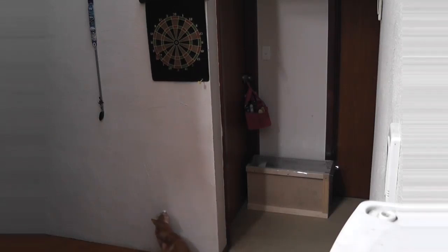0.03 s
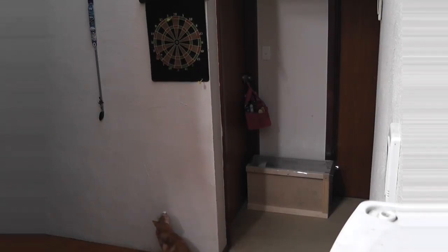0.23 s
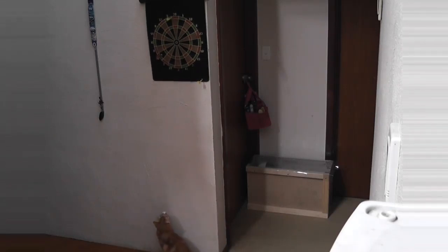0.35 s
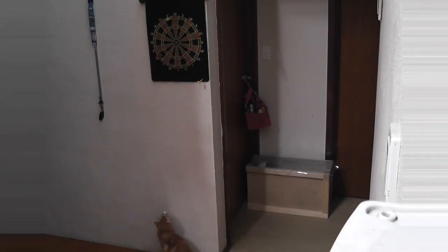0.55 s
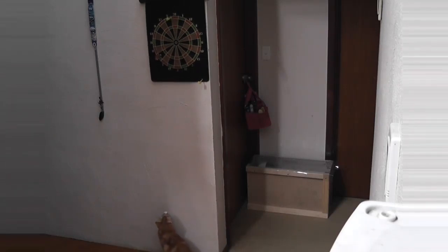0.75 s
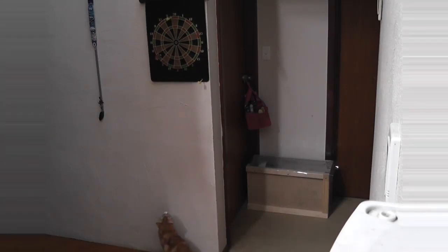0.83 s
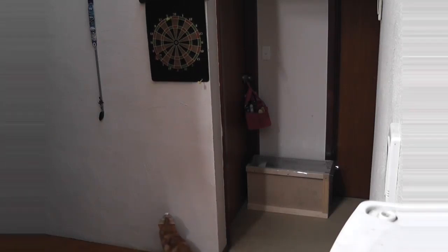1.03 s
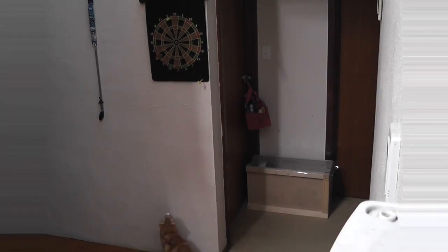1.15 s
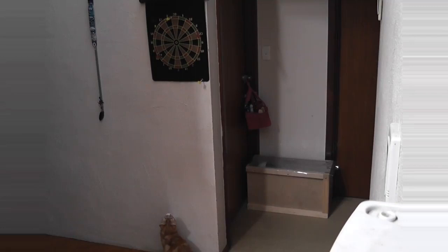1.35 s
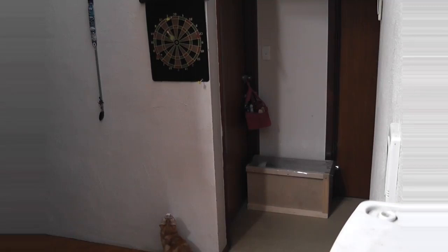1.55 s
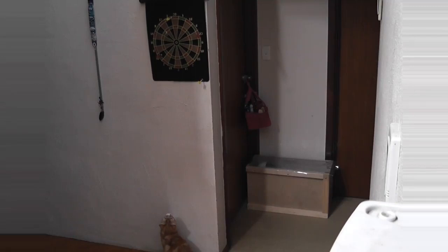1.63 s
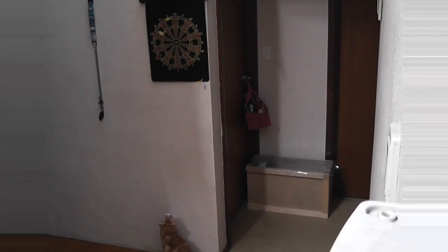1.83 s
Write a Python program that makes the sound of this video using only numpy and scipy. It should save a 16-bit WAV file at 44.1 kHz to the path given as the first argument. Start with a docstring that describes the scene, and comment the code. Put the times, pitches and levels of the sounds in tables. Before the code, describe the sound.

Two magnetic darts strike a hanging dartboard with sharp, hollow clacks over a second apart, each ringing on in a small bare room; soft sleeve rustling near the microphone, faint hum and hiss.

```python
"""A soft swishing, likely a sleeve, comes and goes close to the microphone over a quiet room hum and hiss.
Then two magnetic darts clack onto a dartboard hanging on the wall of a small, bare room.
Each magnet ticks (pulse and noise), knocks a hollow note out of the board (damped modes) and snaps
flat a few ms later (noise burst); walls echo it (delays) and the room rings on (modes, decaying noise)."""
import sys
import numpy as np
from scipy import signal
from scipy.fft import rfft, irfft
from scipy.io import wavfile
from scipy.ndimage import uniform_filter1d

SR = 44100
rng = np.random.default_rng(int(sys.argv[2]) if len(sys.argv) > 2 else 0)


def wav_out(sig):
    """Save sig, one row per channel (or a flat mono array), as 16-bit PCM at SR to the path in sys.argv[1]."""
    wavfile.write(sys.argv[1], SR, np.round(np.clip(np.atleast_2d(sig).T, -1, 1) * 32767).astype(np.int16))


N = 83790  # samples
TIME_S = np.arange(N) / SR
BIN_HZ = np.fft.rfftfreq(N, 1 / SR)


def undb(db):
    """Decibel law: amplitude ratio of a level in dB."""
    return 10 ** (np.asarray(db) / 20)


def at_hz(points, hz):
    """Logarithmic frequency scale: read a (f/Hz, value) table between its points."""
    table_hz, values = np.array(points, float).T
    return np.interp(np.log(np.maximum(hz, 1)), np.log(table_hz), values)


def noise(points):
    """Spectral shaping: Gaussian noise weighted in frequency, scaled to rms 1."""
    spectrum = rfft(rng.standard_normal(N))
    shaped = irfft(spectrum * undb(at_hz(points, BIN_HZ)), N)
    return shaped / shaped.std()


def wide_noise(points, side):
    """Mid-side stereo: an independent noise, added left and subtracted right, sets the width."""
    difference = irfft(rfft(noise(points)) * undb(at_hz(side, BIN_HZ)), N)
    return noise(points) + difference * np.array([[1], [-1]])


def click(points):
    """Minimum phase: folding the cepstrum gives one causal pulse with the given spectrum."""
    log_spectrum = np.log(undb(at_hz(points, BIN_HZ)))
    cepstrum = irfft(log_spectrum, N)
    index = np.arange(N)
    fold = np.where(index < N // 2, 1 + np.sign(index), 0)  # keep zero, double the causal half
    return irfft(np.exp(rfft(cepstrum * fold)), N)


def brighten(x, db_per_octave):
    """Spectral tilt: a short minimum-phase filter slopes the three octaves above 2 kHz."""
    tilt = click([(2000, 0), (16000, 3 * db_per_octave)])
    return signal.fftconvolve(x, tilt[None, :256], axes=-1)[:, :N]


def pan(db):
    """Interchannel level difference: left and right gains for L-R in dB."""
    return undb(np.array([[db], [-db]]) / 2)


def fade(t60):
    """Exponential decay: the amplitude falls 60 dB in t60 seconds."""
    return np.exp(-np.log(1000) * TIME_S / t60)


def rise(seconds):
    """Exponential build-up towards 1 with the given time constant."""
    return 1 - np.exp(-TIME_S / seconds)


def late(x, seconds):
    """Propagation delay: shift a sound later by whole samples."""
    k = max(int(seconds * SR), 0)
    silence = np.zeros(x.shape[:-1] + (k,))
    return np.concatenate([silence, x], axis=-1)[..., :N]


def mode(hz, db, t60):
    """Damped oscillator: one struck resonance, first pushed away from the listener."""
    return -undb(db) * np.sin(2 * np.pi * hz * TIME_S) * fade(t60)


# hum spectrum (f/Hz, relative level per Hz/dB) and its left-right difference (f/Hz, side level/dB)
HUM_SPECTRUM = [(15, -48), (25, -20.5), (151, -1), (177, -8), (270, -4), (426, -8), (492, -5.5), (570, -17),
                (638, -7.5), (692, -13.5), (1200, -15), (1560, -37), (2640, -120)]
HUM_WIDTH = [(40, -11), (110, -6), (250, -4.5), (800, -3.5)]
HUM_DB, HUM_PAN_DB = -54, 0.5


def room_hum():
    """Stationary random noise: the low hum of the room."""
    return undb(HUM_DB) * pan(HUM_PAN_DB) * wide_noise(HUM_SPECTRUM, HUM_WIDTH)


# microphone hiss spectrum (f/Hz, relative level per Hz/dB) and left-right difference (f/Hz, side level/dB)
HISS_SPECTRUM = [(600, -10), (1200, 3), (3000, 2), (7000, 3), (11000, -9), (16000, -10)]
HISS_WIDTH = [(1200, 1.5), (2400, -4.5), (4400, -38), (8000, -35), (15000, -27)]
HISS_DB = -58.5


def microphone_hiss():
    """Self-noise: the microphone adds a steady broadband hiss."""
    return undb(HISS_DB) * wide_noise(HISS_SPECTRUM, HISS_WIDTH)


# course of the swishing (t/s, level/dB)
SWISH_COURSE = [(0, -42), (.094, -50), (.17, -49.5), (.26, -50.5), (0.318, -46), (0.356, -42), (.43, -48),
                (.52, -53.5), (.61, -57), (.72, -51.5), (.81, -45.5), (.9, -47), (.99, -44), (1.1, -46.5),
                (1.19, -48.5), (1.27, -54), (1.35, -45.5), (1.41, -45.5), (1.47, -50.5), (1.62, -56),
                (1.75, -49.5), (1.83, -48.5), (1.9, -52)]
# cloth noise spectrum (f/Hz, relative level per Hz/dB) and left-right difference (f/Hz, side level/dB)
SWISH_SPECTRUM = [(530, -5), (900, -14), (1120, -7.5), (1370, -6.5), (2020, -0.5), (2510, -4.5), (2930, -1),
                  (4180, -2.5), (5840, -1.5), (12100, -5), (15500, -11)]
SWISH_WIDTH = [(1200, -3), (2400, -27), (4400, -56), (6500, -77), (8100, -8.5), (10500, -12), (15000, -43)]
GRAIN_DB, GRAIN_SAMPLES = 1.0, 120  # rms of the level flutter, averaging length


def swish():
    """Friction noise: cloth slides near the microphone, a fine-grained hiss swelling with each movement."""
    course_s, course_db = np.array(SWISH_COURSE).T
    grain = uniform_filter1d(rng.standard_normal(N), size=GRAIN_SAMPLES)
    level_db = np.interp(TIME_S, course_s, course_db) + GRAIN_DB * grain / grain.std()
    return undb(level_db) * wide_noise(SWISH_SPECTRUM, SWISH_WIDTH)


# diffuse tail spectrum (f/Hz, relative level per Hz/dB) and left-right difference (f/Hz, side level/dB)
TAIL_SPECTRUM = [(50, -25), (150, -26), (320, -5), (500, -7), (790, -7), (1000, -17), (1500, -15.5),
                 (2300, -22.5), (3400, -22.5), (5000, -26.5), (8000, -29), (16000, -43.5)]
TAIL_WIDTH = [(100, -19), (400, -10), (800, -5), (1500, -8), (2500, -14), (4500, -84), (8000, -13),
              (15000, -27)]
# build-up of the tail (f/Hz, time constant/s) and its decay (f/Hz, t60/s)
TAIL_BUILD_UP = [(125, 0.052), (500, 0.086), (1000, 0.004), (2000, 0.0015), (8000, 0.00067)]
TAIL_DECAY = [(100, 0.54), (500, 0.69), (1500, 0.64), (3500, 0.48), (7000, 0.39), (14000, 0.2)]
TAIL_DB = -21.5


def tail():
    """Diffuse reverberation in octave bands: the lows come late, the treble dies first."""
    spectrum = rfft(wide_noise(TAIL_SPECTRUM, TAIL_WIDTH))
    octave = np.log2(np.clip(BIN_HZ, 128, 16384))
    out = 0
    for k in range(7, 15):  # band centres 2 ** k, 128 to 16384 Hz
        weight = np.maximum(1 - abs(octave - k), 0)  # overlapping triangles
        band = irfft(spectrum * weight, N)
        build_up = rise(at_hz(TAIL_BUILD_UP, 2 ** k))
        out = out + band * build_up * fade(at_hz(TAIL_DECAY, 2 ** k))
    return undb(TAIL_DB) * out


# long ringing notes of board and room (f/Hz, level/dB, t60/s, L-R/dB)
RINGING_NOTES = [(395, -42, 0.95, -4), (419, -35, 0.47, 6), (428.5, -29.5, 0.64, 1), (483, -28.5, 0.8, -4),
                 (512, -23, 0.68, 3), (517, -38.5, 0.95, 0), (536, -20, 0.57, -9.5),
                 (532.4, -27.5, 0.47, 3), (578, -30.5, 0.86, 4), (598, -37.5, 1, -3), (650, -41, 0.37, -10),
                 (700, -45, 1, -7), (776, -38, 0.69, 1), (930, -46.5, 0.8, -6)]
RING_RISE_S = 0.071


def ringing():
    """Beating of close resonances: a few notes around the knock build up and beat as they die."""
    notes = sum(pan(pan_db) * mode(hz, db, t60) for hz, db, t60, pan_db in RINGING_NOTES)
    return rise(RING_RISE_S) * notes


# wall echoes (delay t/s, level/dB, L-R/dB)
WALL_ECHOES = [(.0081, -12.5, -18.5), (.0140, -10.5, 16.5), (.0162, -22.5, -25), (.0222, -10, -3),
               (0.039, -32, 19), (.0469, -11.5, 5), (0.052, -17, -2), (.0587, -20.5, 2),
               (0.0731, -19.5, -2), (0.0763, -23, -8), (.0882, -30, 7), (.1036, -17.5, 0),
               (.1131, -15.5, -2), (.1151, -23, 0), (0.1283, -25, 4), (.1368, -19.5, -1), (.1463, -24, -5)]
ECHO_HZ, ECHO_Q, ECHO_DB = 510, 1.78, 0.5  # band-pass centre, sharpness and gain


def echoes(direct):
    """Early reflection: nearby walls throw back mainly the hollow knock."""
    first_s = WALL_ECHOES[0][0]
    ratio = BIN_HZ / ECHO_HZ
    band_pass = ratio / np.hypot(ratio, ECHO_Q * (ratio ** 2 - 1))
    # delaying before the zero-phase filter leaves room for its pre-ringing
    hollow = undb(ECHO_DB) * irfft(rfft(late(direct, first_s)) * band_pass, N)
    return sum(undb(db) * pan(pan_db) * late(hollow, s - first_s) for s, db, pan_db in WALL_ECHOES)


def thump(db):
    """Low damped mode: the board thumps against the wall."""
    return mode(95, -41 + db, 0.0053)


# board modes, the hollow knock first (f/Hz, t60/s, level at first dart's spot/dB, at second's/dB)
BOARD_MODES = [(522.5, 0.022, 5, 4), (303, 0.012, -14, -11), (853, 0.015, -13, -23.5),
               (925, 0.022, -20, -8), (1386, 0.01, -13.5, -9), (1725, 0.02, -16, -29),
               (2640, .02, -24.5, -34), (3156, 0.012, -17, -18.5), (3850, .018, -17, -40),
               (5740, 0.024, -45, -26)]
KNOCK_RISE_S = 0.0015
MUTE_DB, MUTE_S = -5.5, 0.003  # damping of the knock and its time constant


def board(spot, snap_s):
    """Modal excitation: the landing spot weights the modes; the magnet, once flat, damps the knock."""
    knock, *others = [mode(hz, db[spot], t60) for hz, t60, *db in BOARD_MODES]
    mute = undb(MUTE_DB * late(rise(MUTE_S), snap_s))
    return knock * rise(KNOCK_RISE_S) * mute - sum(others)


# tick and scrape of the magnet's rim (f/Hz, relative level per Hz/dB)
TICK_SPECTRUM = [(300, 9.5), (1200, 0.5), (2300, -11), (3400, -3), (4700, -10), (6200, -1), (9000, -20),
                 (11500, -1), (16000, -15)]
TICK_DB = -6
SCRAPE_DB, SCRAPE_T60_S = -22.5, 0.0039


def rim_tick(db):
    """Impulsive contact: the magnet's rim gives one pulse and a brief scrape of noise."""
    scrape = undb(SCRAPE_DB) * noise(TICK_SPECTRUM) * fade(SCRAPE_T60_S)
    return undb(db) * (undb(TICK_DB) * click(TICK_SPECTRUM) + scrape)


# contact noise of the magnet snapping flat (f/Hz, relative level per Hz/dB)
SNAP_SPECTRUM = [(200, -1), (700, 0), (1500, 8), (2300, -8.5), (3300, 0.5), (4700, -12.5), (6200, -12),
                 (8000, -9), (10500, -18), (16000, -20)]
SNAP_DB, SNAP_T60_S = -11, 0.024


def flat_snap(db):
    """Contact noise: the whole face meets the board in a decaying noise burst."""
    return undb(SNAP_DB + db) * noise(SNAP_SPECTRUM) * fade(SNAP_T60_S)


def clack(spot, tick_db, snap_db, snap_s):
    """Superposition: rim tick and board knock together, then the magnet snaps flat."""
    return board(spot, snap_s) - rim_tick(tick_db) + late(flat_snap(snap_db), snap_s)


# darts (t/s, level/dB; thump, tick and snap offsets/dB; snap delay/s; tail offset/dB; treble tilt/dB per octave)
DART_HITS = [(0.2101, -4, -18, 5, -2, 0.0047, 1, -2.5), (1.4857, -4, 7, 3, -3.5, 0.0046, -2, 0.5)]


def darts():
    """Impulse response: each dart clacks and thumps the board; the room answers both alike."""
    out, rings, diffuse = 0, ringing(), tail()
    for spot, hit_settings in enumerate(DART_HITS):
        s, db, thump_db, tick_db, snap_db, snap_s, tail_db, treble_db = hit_settings
        direct = clack(spot, tick_db, snap_db, snap_s)
        room = echoes(direct) + rings + undb(tail_db) * diffuse
        hit = direct - thump(thump_db) + room
        out = out + undb(db) * late(brighten(hit, treble_db), s)
    return out


def scene():
    """Superposition of the quiet room, the swishing and the darts."""
    return room_hum() + microphone_hiss() + swish() + darts()


def record(dry):
    """Band limiting: the recorder cuts the top above 16 kHz with a steep elliptic low-pass."""
    low_pass = signal.ellip(10, .2, 80, 16000, fs=SR, output="sos")
    return signal.sosfilt(low_pass, dry)


dry = scene()
out = record(dry)
wav_out(out)
```